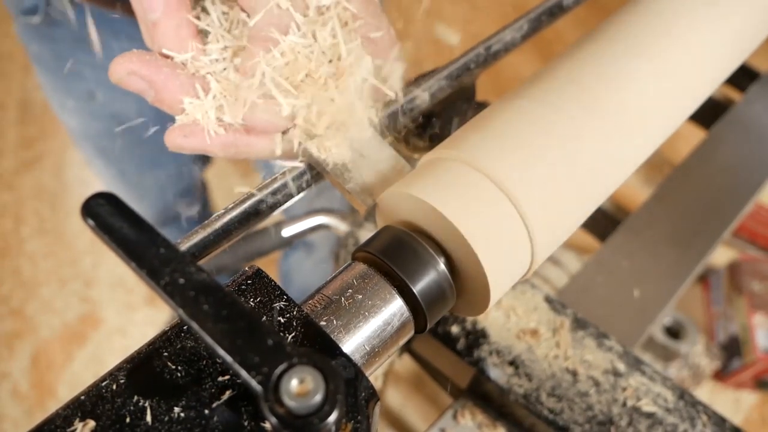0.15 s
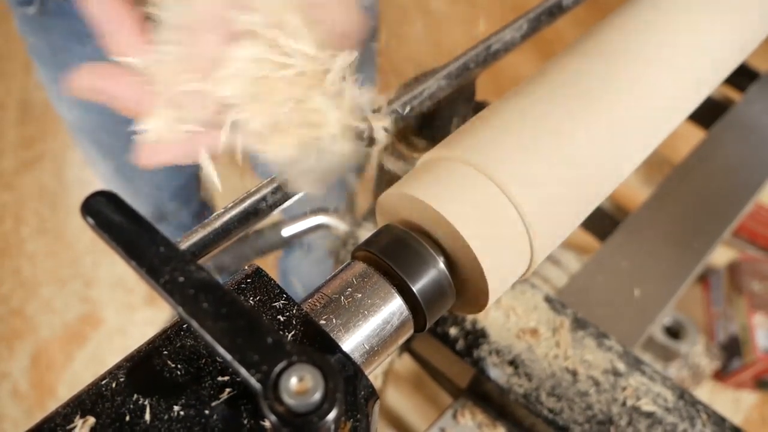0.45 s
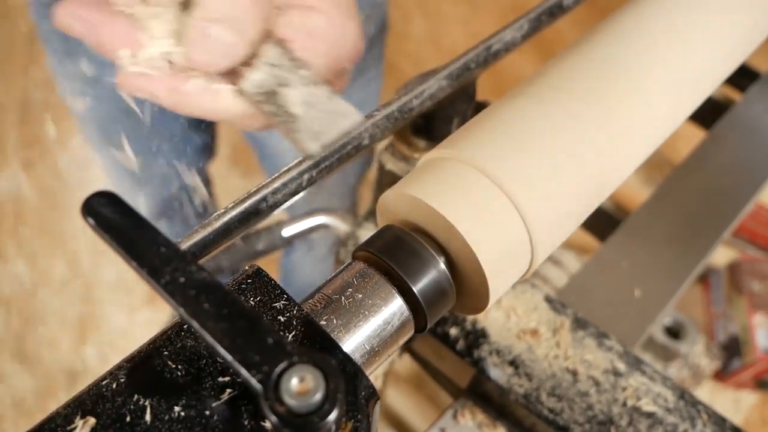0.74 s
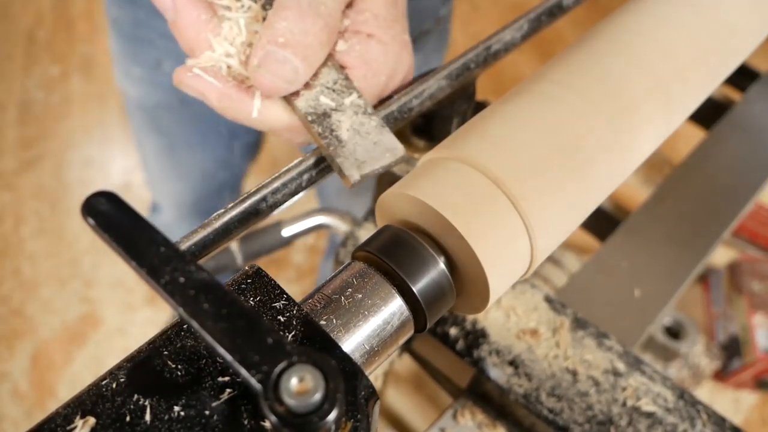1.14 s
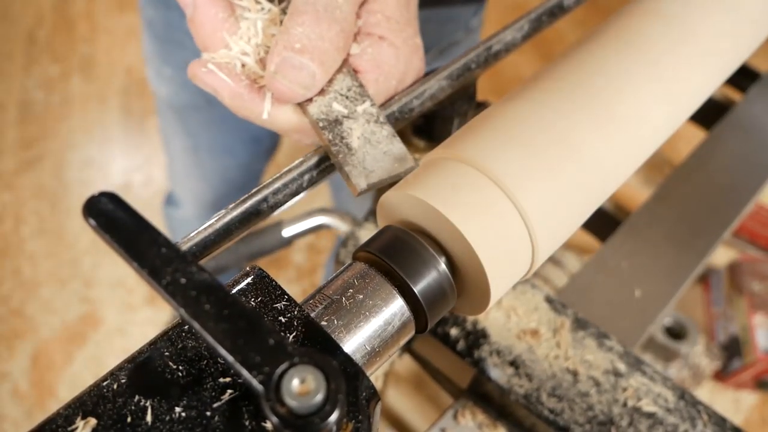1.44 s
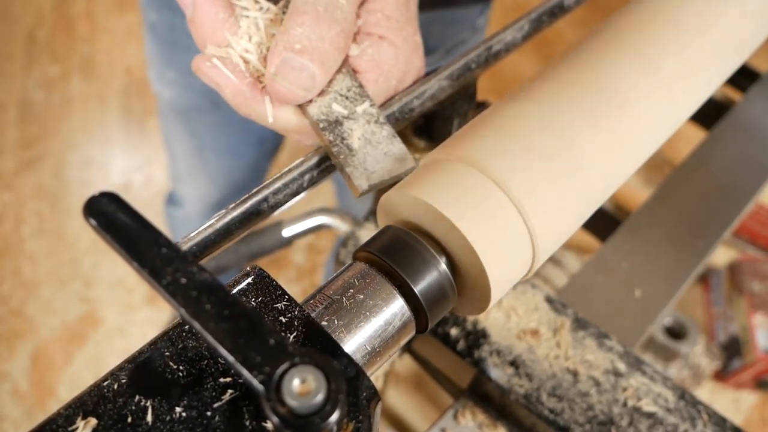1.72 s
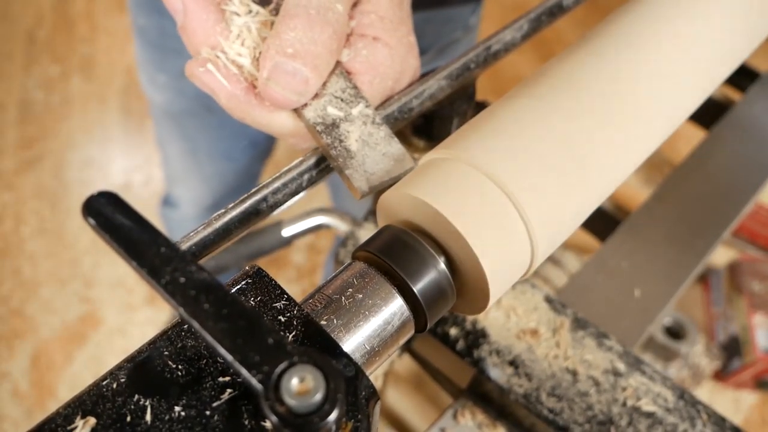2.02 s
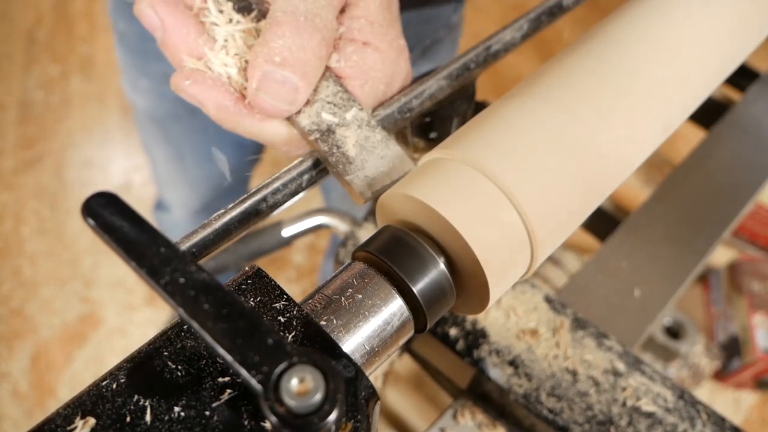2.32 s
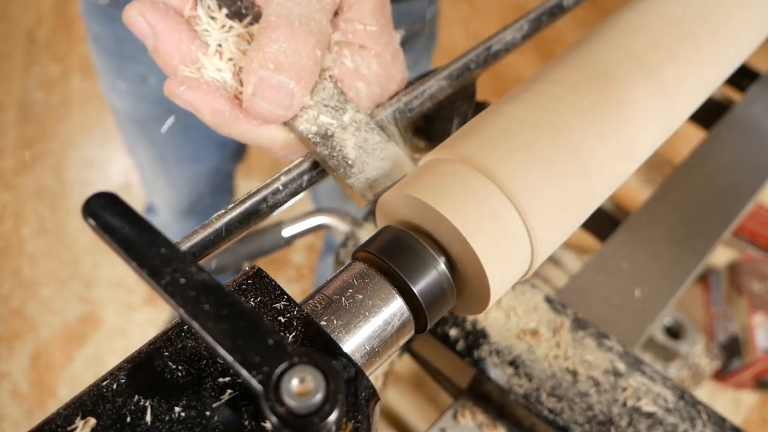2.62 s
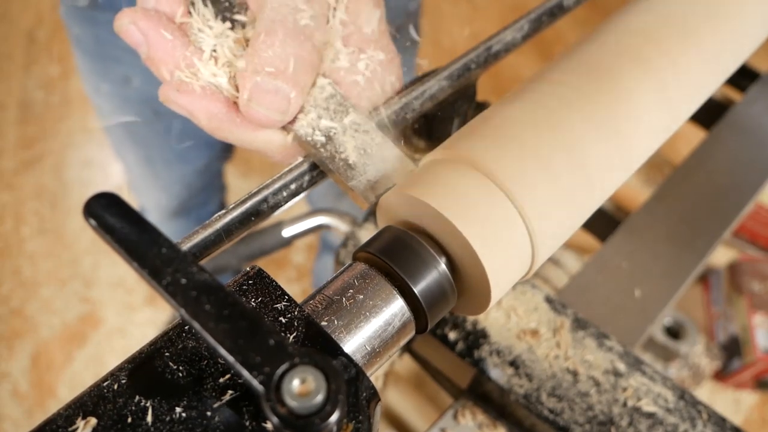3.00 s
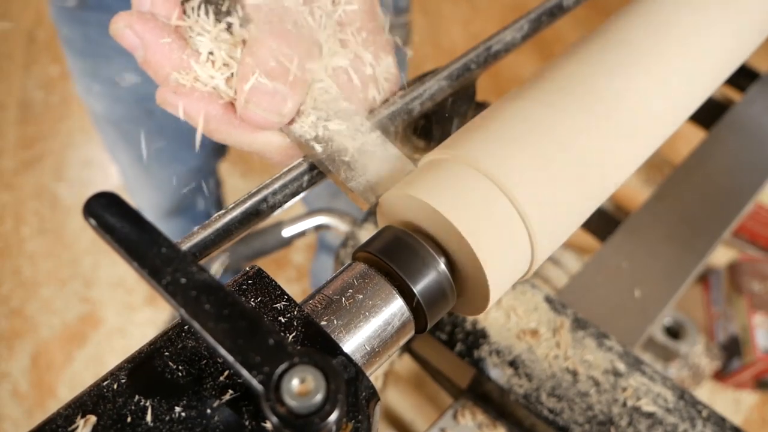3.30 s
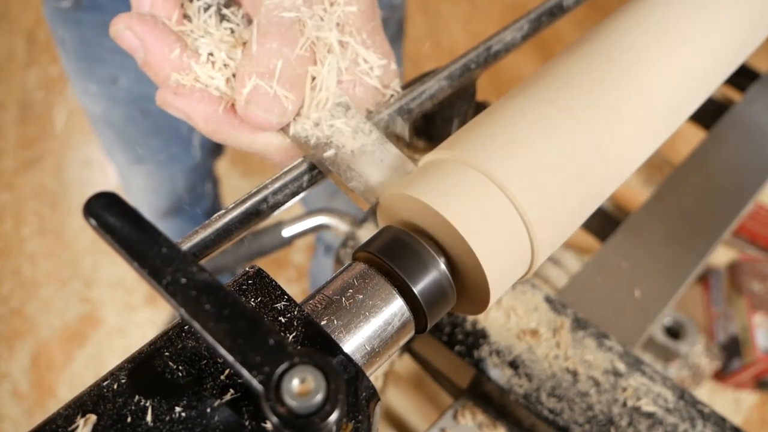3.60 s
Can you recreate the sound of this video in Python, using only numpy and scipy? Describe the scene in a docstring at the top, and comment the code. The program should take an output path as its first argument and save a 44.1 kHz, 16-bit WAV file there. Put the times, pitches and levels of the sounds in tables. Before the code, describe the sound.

A gouge on a spinning wooden blank ends a heavy hissing cut; shavings rustle, steel taps the rest, then a light buzzing rub grows into a howling cut. Close, nearly mono, small workshop.

```python
"""A small workshop, close to a quiet lathe, nearly mono: a wooden blank spins under room tone and faint motor tones.
A steel gouge ends a heavy cut, shavings are shaken off, the gouge lands on its rest, grazes the high spot,
rubs lightly and then bites. Noise laid out once a turn is the surface under the edge: a light rub repeats it and
buzzes at the spindle rate, a deep cut tears fresh wood. Resonances colour that force into blank, tool and hiss;
wavering tones are the bed hum and the chatter of tool and blank."""
import sys
import numpy as np
from scipy import signal
from scipy.fft import rfft, irfft, next_fast_len
from scipy.io import wavfile
from scipy.ndimage import map_coordinates

SR = 44100
rng = np.random.default_rng(int(sys.argv[2]) if len(sys.argv) > 2 else 0)


def digitize_waveform(pressure):
    """Quantize a signal to 16-bit integers and store it at the path in sys.argv[1].

    Rows of a 2-D input are taken as channels; values are limited to [-1, 1].
    """
    field = np.atleast_2d(pressure).T
    bounded = np.clip(field, -1, 1)
    quanta = np.round(bounded * 32767).astype(np.int16)
    wavfile.write(sys.argv[1], SR, quanta)


N = 165375
T = np.arange(N) / SR  # seconds


def amp(db):
    """Decibels to amplitude."""
    return 10 ** (np.asarray(db) / 20)


def unit(x):
    """x scaled to rms 1."""
    return x / np.sqrt(np.mean(x ** 2) + 1e-20)


def along(points, hz):
    """Value at hz between (Hz, value) points on a log frequency axis."""
    f, v = np.transpose(points)
    return np.interp(np.log(hz + 1), np.log(f + 1), v)


def curves(rows):
    """One value per sample for each column after the time."""
    s, *cols = np.transpose(rows)
    return [np.interp(T, s, c) for c in cols]


def wobble(rate):
    """A smooth random curve, rate knots a second."""
    return map_coordinates(rng.standard_normal(int(N * rate / SR) + 4), [T * rate])


def oscillator(hz):
    """A sine of rms 1 whose frequency follows hz."""
    return np.sqrt(2) * np.sin(2 * np.pi * np.cumsum(hz) / SR)


def filtered(x, response):
    """x through a filter given as a function of frequency."""
    m = next_fast_len(N + SR // 2)
    return irfft(rfft(x, m) * response(np.fft.rfftfreq(m, 1 / SR)), m)[..., :N]


def coloured(spectrum):
    """Noise of rms 1 with the given spectrum, silent below its first point."""
    noise = rng.standard_normal(N)
    return unit(filtered(noise, lambda hz: amp(along(spectrum, hz)) * (hz > spectrum[0][0])))


def span(rows):
    """1 inside the times of a table, fading over 25 ms at both ends."""
    return np.clip(np.minimum(T - rows[0][0], rows[-1][0] - T) / 0.025, 0, 1)


# Spectrum of the workshop's air. Each row: frequency in Hz, relative density in dB per Hz.
ROOM_SPECTRUM = [(76, -29), (130, -11.5), (172, -18.5), (285, -13.5), (500, -13.5), (625, -10.5),
                 (706, -26), (796, -11), (1190, -29), (1320, -20.5), (1640, -32.5), (2140, -26),
                 (3460, -31), (5080, -42.5), (14800, -57), (16000, -42.5)]
ROOM_DB, ROOM_LOW_DB = -67.5, -79  # rms levels of the tone and of the low part


def room_tone():
    """Steady background of the workshop: broad noise over a weaker low rumble."""
    low = coloured([(25, -17), (60, -5), (130, -12.5), (170, -40)])
    return amp(ROOM_DB) * coloured(ROOM_SPECTRUM) + amp(ROOM_LOW_DB) * low


# Tones of the running motor. Each row: centre frequency in Hz, centre level in dB.
MOTOR_TONES = [(409, -77.5), (565, -79.5), (791, -82.5), (870, -80), (1351, -85)]


def idle():
    """Faint tones of the running motor, each drifting slightly in pitch and level."""
    return sum(amp(db + 2.5 * wobble(23)) * oscillator(hz + 3 * wobble(15)) for hz, db in MOTOR_TONES)


# Shavings leaving the hand. Each row: time in seconds, level in dB before the lift and flutter below.
SHAKE_LEVEL = [(0.66, -89.5), (0.77, -74), (0.898, -78.5), (1.036, -75), (1.12, -100)]
# Spectrum of their rustle. Each row: frequency in Hz, relative density in dB per Hz.
FLAKE_SPECTRUM = [(880, 3), (1500, -7.5), (1670, -23), (1900, -6.5), (6690, -19), (10500, -11.5),
                  (16000, -24.5)]
# Low thumps on the bench. Each row: time in seconds, level in dB.
THUMP_LEVEL = [(0.9, -90), (0.94, -66), (1.078, -71.5), (1.098, -62), (1.118, -72), (1.202, -66),
               (1.272, -97)]


def handling():
    """Shavings rustle off the hand as fluttering noise; the bench takes a few low thumps."""
    flutter_db = 2.03 * wobble(270)
    rustle = amp(curves(SHAKE_LEVEL)[0] + 6 + flutter_db) * coloured(FLAKE_SPECTRUM) * span(SHAKE_LEVEL)
    low = coloured([(35, -13), (70, 3), (130, -5.5), (200, -48.5)])
    return rustle + amp(curves(THUMP_LEVEL)[0]) * low * span(THUMP_LEVEL)


# Gouge landing and bouncing on the rest. Each row: start in seconds, level in dB before the 8.5 dB cut below.
REST_TAPS = [(0.841, -30), (0.8509, -32.5), (0.856, -39)]
# Modes of the steel. Each row: frequency in Hz, mean relative level in dB, 60 dB decay time in seconds.
STEEL_MODES = [(600, -15, 0.06), (916, -12.5, .03), (1870, -3, 0.025), (2200, 3, 0.018), (2820, 0, 0.025),
               (3900, -3, 0.014)]
CRACK_DB, CRACK_S = 7.5, 0.024  # impact noise: level against the modes, 60 dB decay time
SOFTEN_HZ = 4560  # corner of each of three low-pass stages on the taps
# Edge touching the high spot. Each row: start in seconds, starting level in dB, pitch in Hz,
# band reach either way as a ratio.
EDGE_GRAZES = [(1.187, -62.5, 5030, 2.9), (1.229, -67, 4250, 1.2), (1.28, -64.5, 4170, 1.05),
               (1.329, -70, 4200, 1.06), (1.345, -65.5, 12300, 1.25), (1.393, -71.5, 12500, 1.25),
               (1.441, -70, 12560, 1.25), (1.488, -66.5, 12500, 1.22), (1.521, -58, 4100, 1.1)]


def gouge():
    """Steel taps the rest as decaying modes and a crack; its edge ticks the high spot as short scratches."""
    out, t = np.zeros(N), np.arange(SR // 8) / SR
    for s, db in REST_TAPS:
        ring = 0
        for hz, level, t60 in STEEL_MODES:
            decay = amp(level + rng.normal(0, 3.2) - 60 * t / t60)  # each tap excites the modes differently
            ring = ring + decay * np.sin(2 * np.pi * hz * t)
        crack = amp(CRACK_DB - 60 * t / CRACK_S) * rng.standard_normal(len(t))
        out[round(s * SR):][:len(t)] += amp(db - 8.5) * (ring + crack)
    out = filtered(out, lambda f: 1 / (1 + 1j * f / SOFTEN_HZ) ** 3)
    for s, db, hz, reach in EDGE_GRAZES:
        band = signal.butter(2, [hz / reach, hz * reach], 'bandpass', fs=SR, output='sos')
        scratch = unit(signal.sosfilt(band, rng.standard_normal(len(t))))
        out[round(s * SR):][:len(t)] += amp(db - 60 * t / 0.014) * scratch  # 60 dB down in 14 ms
    return out


# Turning of the blank. Each row: time in seconds, spindle speed in turns a second,
# share of the surface that comes round unchanged.
SPINDLE = [(0, 20.4, .6), (.45, 20.4, .6), (1.1, 20.94, .98), (2.25, 20.94, .98), (2.6, 20.92, .85),
           (2.9, 20.91, .7), (3.75, 20.91, .6)]


def turning():
    """Turns made so far and the share of the surface kept from the last turn."""
    speed, keep = curves(SPINDLE)
    return np.cumsum(speed) / SR, keep


# How deep the edge goes. Each row: time in seconds, depth from 0 for the rub to 1 for the cut.
EDGE_DEPTH = [(1.7, 0.03), (2.2, 0.2), (2.4, 0.95), (2.85, 1)]
# How far round it cuts. Each row: time in seconds, share of the turn on which the edge tears fresh wood.
CUT_ROUND = [(2.6, 0.11), (2.85, 0.96)]


def stage(rub, bite, full):
    """A value that follows the edge from rub through first bite to full cut."""
    depth, whole = curves(EDGE_DEPTH)[0], curves(CUT_ROUND)[0]
    return (1 - whole) * (rub + depth * (bite - rub)) + whole * full


LIFT_S, LIFT_FADE_S = 0.458, 0.0046  # the tool leaves the wood; exponential time constant
TOUCH_S, SETTLE_S, TOUCH_DB = 1.5, 1.541, -6.5  # the edge brushes the wood, then settles on it


def contact():
    """1 while the edge is in the wood, less while it brushes, 0 when it is away."""
    lifting = np.exp(-np.clip(T - LIFT_S, 0, 1) / LIFT_FADE_S)
    brush = amp(TOUCH_DB) * np.clip((T - TOUCH_S) / 0.018, 0, 1)
    settled = np.clip((T - SETTLE_S) / 0.008, 0, 1)
    return np.where(T < 1, lifting, np.maximum(brush, settled))


# Hum of the lathe bed in two stretches. Each row: time in seconds, frequency in Hz, level in dB.
BED_HUM_PATH = [
    [(0.0, 210.2, -42), (0.212, 202.5, -41.5), (0.346, 203, -42), (0.408, 212.5, -41), (0.454, 204.1, -48),
     (0.488, 189, -72)],
    [(1.5, 217.5, -85), (1.55, 209.4, -62.5), (2.02, 209.4, -53.5), (2.35, 209.0, -54), (2.53, 210.5, -76),
     (2.77, 206.9, -63.5), (3.74, 203.7, -55.5), (3.75, 208, -45)],
]
# Howl of the blank. Each row: time in seconds, frequency in Hz, level in dB.
HOWL_PATH = [(1.5, 523, -75), (1.58, 523.3, -60), (1.93, 523.3, -49), (2.5, 522.5, -44), (2.59, 521, -48),
             (2.614, 519.5, -38), (2.65, 517, -42), (2.665, 516, -55), (2.696, 515, -52),
             (2.71, 515.5, -35.5), (2.795, 515.5, -35.5), (2.81, 516, -31), (3.1, 517, -30),
             (3.24, 517.5, -31), (3.27, 517.5, -38), (3.3, 517.5, -30), (3.45, 517.5, -29.5),
             (3.6, 520, -42), (3.66, 521, -29), (3.7, 521, -27.5), (3.722, 520, -37), (3.75, 520, -29)]
THIRD_DB, BED_THIRD_DB = -18, -29.5  # third harmonic against the fundamental of howl and hum
THIRD_AT_DB = -30  # below this level the third harmonic falls off faster than its fundamental
CHATTER_WAVER_DB = 0.8


def tone(rows, overtone_db):
    """A wavering self-excited vibration with its third harmonic."""
    hz, db = curves(rows)
    hz = hz + 0.5 * wobble(30)
    level = amp(db + CHATTER_WAVER_DB * wobble(40))
    third = amp(overtone_db + 1.7 * np.minimum(db - THIRD_AT_DB, 0))
    return level * (oscillator(hz) + third * oscillator(3 * hz))


def chatter():
    """Bed hum and the howl of the blank, sounding only while the edge is in the wood."""
    hum = tone(BED_HUM_PATH[0] + BED_HUM_PATH[1], BED_THIRD_DB)
    return contact() * (hum + tone(HOWL_PATH, THIRD_DB) * (T > 1))


# Ridges round the blank: a list of counts a turn.
RIDGE_COUNTS = [29, 43, 48, 60, 62, 70]
# Their mean amplitudes, one row a count: dB to the body in the rub, at first bite, in the full cut.
RIDGE_DB = [(-12, -12, -14), (-8, -11, -20), (-8, 2, -9), (-15, -3, -14), (-8, -11, -20), (-16, -7, -19)]
END_GRAIN_DB, ONCE_DB, GRAIN_PHASE = 0.5, 0.5, 1.4  # swell twice and once a turn; phase in radians
GRIT_DB = 3  # spikiness of the fibres
POINTS_A_TURN = 2112


def surface():
    """Force on the edge: each turn meets the last one's surface, partly cut anew; end grain passes twice a turn."""
    turns, keep = turning()
    shape = (90, POINTS_A_TURN)
    rows = rng.standard_normal(shape) * amp(GRIT_DB * rng.standard_normal(shape))
    for k in range(1, int(turns[-1]) + 2):
        same = np.interp(k, turns, keep)
        rows[k] = same * rows[k - 1] + np.sqrt(1 - same ** 2) * rows[k]
    force = map_coordinates(rows.ravel(), [turns * POINTS_A_TURN], order=3)
    ridges = 0
    for count, db in zip(RIDGE_COUNTS, RIDGE_DB):
        level = amp(stage(*db) + 2.6 * wobble(8.1))
        ridges = ridges + level * np.sin(2 * np.pi * (count * turns + rng.random()))
    grain_db = END_GRAIN_DB * np.cos(4 * np.pi * turns + GRAIN_PHASE)
    grain_db += ONCE_DB * np.cos(2 * np.pi * turns + GRAIN_PHASE / 2)
    return unit(force), ridges * (T > 1), grain_db


WIDEN = 1.28  # each listed resonance is a cluster of modes, wider at the top and steeper at the skirts


def blended(f, rows):
    """Gain of (Hz, width Hz before widening, dB) resonances with steep skirts, whose powers add."""
    power = 0
    for hz, width, db in rows:
        w = WIDEN * width
        peak = np.abs(1j * f * w / (hz * hz - f * f + 1j * f * w))
        power = power + (amp(db) * peak ** 1.585) ** 2
    return np.sqrt(power)


def rings(force, table, depth_rows):
    """The force through a set of resonances whose strengths depend on how the tool meets the wood."""
    depth = curves(depth_rows)[0]
    ways = []
    for way in range(3):
        modes = [(r[0], r[1], r[2 + way]) for r in table]
        ways.append(unit(filtered(force, lambda f: blended(f, modes))))
    first, rub, second = ways
    return np.where(T < 1, first, np.sqrt(1 - depth) * rub + np.sqrt(depth) * second)


# High spots, each flicking one ring of tool or blank. Each row: place in turns, width in turns, frequency in Hz,
# bandwidth in Hz before widening, level in dB to the hiss in the rub, the same at first bite.
HIGH_SPOTS = [(.01, .06, 4120, 150, -2, -10), (.85, .045, 4120, 150, -6, -13),
              (.5, .09, 4120, 150, -8, -17), (.18, .14, 3120, 200, -14, -5), (.5, .08, 2090, 150, -22, -9),
              (.5, .05, 1400, 250, -7, -13), (.62, .08, 950, 200, -5, -12)]


def high_spots(force):
    """Until the cut runs all round, the same high spots flick tool and blank on every turn."""
    turns, out = turning()[0], 0
    for place, width, hz, width_hz, rub_db, bite_db in HIGH_SPOTS:
        distance = (turns - place + 0.5) % 1 - 0.5
        gate = np.exp(-(distance / width) ** 2)
        flick = unit(filtered(gate * force, lambda f: blended(f, [(hz, width_hz, 0)])))
        out = out + amp(stage(rub_db, bite_db, bite_db - 20.5)) * flick
    return out * (T > 1)


# The heavy first cut. Each row: time in seconds, level of the blank's body in dB, of the tool's ring in dB,
# of the tearing hiss in dB.
HEAVY_CUT_LEVELS = [(0.0, -28.5, -46, -29), (0.014, -28.5, -30, -28), (0.15, -33, -31, -32.5),
                    (0.162, -36.5, -24, -30), (0.204, -34.5, -31.5, -30.5), (0.37, -30, -28, -31),
                    (0.42, -38, -37.5, -33), (0.46, -43, -58, -65)]
# The rub and second cut. Each row: time in seconds, body level in dB, ring level in dB, hiss level in dB.
RUB_AND_CUT_LEVELS = [(1.53, -62, -65, -61), (1.57, -55.5, -62.5, -58.5), (1.81, -49, -59.5, -55),
                      (1.94, -50.5, -64.5, -58.5), (2.14, -49.5, -57, -53.5), (2.16, -49, -61, -56),
                      (2.42, -46.5, -50, -44), (2.77, -46, -41.5, -39.5), (2.82, -43, -39, -36),
                      (3.05, -40.5, -39, -35), (3.44, -39, -36, -31.5), (3.501, -38.5, -48, -37),
                      (3.58, -43.5, -46.5, -47), (3.6, -48, -59, -44.5), (3.63, -36.5, -44, -43),
                      (3.65, -46, -42, -32), (3.66, -35, -38, -31), (3.7, -43.5, -45, -32),
                      (3.72, -39.5, -35, -39.5), (3.75, -33.5, -38, -24.5)]
# Resonances of the blank's body. Each row: frequency in Hz, width in Hz before widening,
# relative level in dB in the first cut, in the rub, in the second cut.
BODY_MODES = [(369.4, 140, -15.5, -10, -16.5), (532.3, 68, 0.5, 6, -4.5), (592.4, 43, -5.5, -6, -18),
              (800, 86, -3.5, -15, -11.5), (910, 57, -6.5, 1.5, -11), (1006.5, 49, -4, -10, -7),
              (1264, 78, -9, -3.5, -15.5), (1420, 200, -14.5, -8, -22.5)]
# Ring of the tool. Each row: frequency in Hz, width in Hz before widening,
# relative level in dB in the first cut, in the rub, in the second cut.
TOOL_MODES = [(1930, 130, -9.5, 4, 5.5), (2089, 88, 12.5, -4, 19)]
# Hiss of tearing fibres. Each row: frequency in Hz, width in Hz before widening,
# relative level in dB in the first cut, in the rub, in the second cut.
HISS_BANDS = [(3110, 465, -9.5, -18.5, -4.5), (3940, 1100, -7.5, -19, -16.5), (4920, 440, -8, -17, -11),
              (5400, 440, -21, -24, -21.5), (6040, 660, -13, -25, -14), (6630, 350, -18.5, -37, -18.5),
              (7350, 500, -21, -26.5, -23.5), (8480, 230, -14, -20.5, -16), (9050, 400, -17, -30, -19),
              (9570, 300, -17, -20, -16), (10600, 5900, -19, -27.5, -24), (14000, 1300, -27, -24, -23),
              (15300, 1200, -25, -28.5, -26)]
# Spectrum of the rumble. Each row: frequency in Hz, relative density in dB per Hz.
RUMBLE_SPECTRUM = [(12, -49.5), (20, -16.5), (107, -13.5), (150, -10.5), (199, -4.5), (264, -5),
                   (330, -17.5), (430, -38), (730, -120)]
# Rumble in two stretches. Each row: time in seconds, level in dB.
RUMBLE_PATH = [
    [(0.0, -43), (0.026, -45.5), (0.318, -54), (0.358, -48), (0.384, -67), (0.408, -50), (0.46, -78)],
    [(1.5, -87), (1.57, -69), (2.08, -76), (2.11, -67.5), (3.44, -55), (3.58, -70), (3.75, -45)],
]
FRESH_HISS = 0.35  # share of the hiss power torn anew on every turn


def cutting():
    """The surface's force shakes the blank's body, rings the tool and tears fibres, with a rumble below."""
    body_db, ring_db, hiss_db = curves([*HEAVY_CUT_LEVELS, *RUB_AND_CUT_LEVELS])
    force, ridges, grain_db = surface()
    torn = np.sqrt(1 - FRESH_HISS) * force + np.sqrt(FRESH_HISS) * rng.standard_normal(N)
    torn = torn * amp(grain_db + 2.1 * wobble(150))
    body = amp(body_db + 0.52 * grain_db) * (rings(force, BODY_MODES, CUT_ROUND) + ridges)
    ring = amp(ring_db) * rings(torn, TOOL_MODES, EDGE_DEPTH)
    hiss = amp(hiss_db) * (rings(torn, HISS_BANDS, EDGE_DEPTH) + high_spots(force))
    rumble_db = curves(RUMBLE_PATH[0] + RUMBLE_PATH[1])[0] + wobble(4)
    return contact() * (body + ring + hiss + amp(rumble_db) * coloured(RUMBLE_SPECTRUM))


def tail(x, t60, delay):
    """x, delayed by some samples, through a decaying noise tail with one 60 dB decay time per frequency."""
    hz, t, z = signal.stft(rng.standard_normal(SR // 2), SR, nperseg=256)
    h = signal.istft(z * amp(-60 * t / along(t60, hz)[:, None]), SR, nperseg=256)[1]
    return signal.fftconvolve(np.pad(x, (delay, 0)), h / np.linalg.norm(h))[:N]


# Answer of the workshop walls. Each row: frequency in Hz, 60 dB decay time in seconds, gain in dB.
WALL_ECHO = [(200, 0.6, -9.5), (530, 0.53, -15), (905, 0.55, -14), (1330, 0.63, -12.5), (2100, 0.34, -15.5),
             (5000, 0.4, -23.5), (12000, 0.22, -18)]


def walls(near):
    """The close sources come back from the walls about 9 ms later as a diffuse tail."""
    echo = tail(near, [r[:2] for r in WALL_ECHO], delay=400)
    return filtered(echo, lambda hz: amp(along([r[::2] for r in WALL_ECHO], hz)))


# Slight width of the sound. Each row: frequency in Hz, gain of the side signal's tail in dB.
SIDE_GAIN = [(60, -18.5), (200, -28.5), (600, -34), (1290, -25.5), (2380, -26.5), (4400, -21.5),
             (15000, -17)]


def spread(mid):
    """A short diffuse tail of the sound, added on the left and subtracted on the right."""
    side = tail(mid, [(200, 0.068), (9000, 0.046)], delay=0)
    side = filtered(side, lambda hz: amp(along(SIDE_GAIN, hz)))
    return np.array([mid + side, mid - side])


def scene():
    """Close sources, the walls' answer, chatter, motor and room tone, nearly mono."""
    near = cutting() + gouge() + handling()
    return spread(near + walls(near) + chatter() + idle() + room_tone())


CEILING, KNEE = 0.098, 6  # peak amplitude limit, sharpness of the bend
TOP_HZ = 15800


def record(dry):
    """Soft ceiling on the peaks, then the band limit."""
    soft = dry / (1 + np.abs(dry / CEILING) ** KNEE) ** (1 / KNEE)
    return filtered(soft, lambda hz: hz < TOP_HZ)


dry = scene()
out = record(dry)
digitize_waveform(out)
```